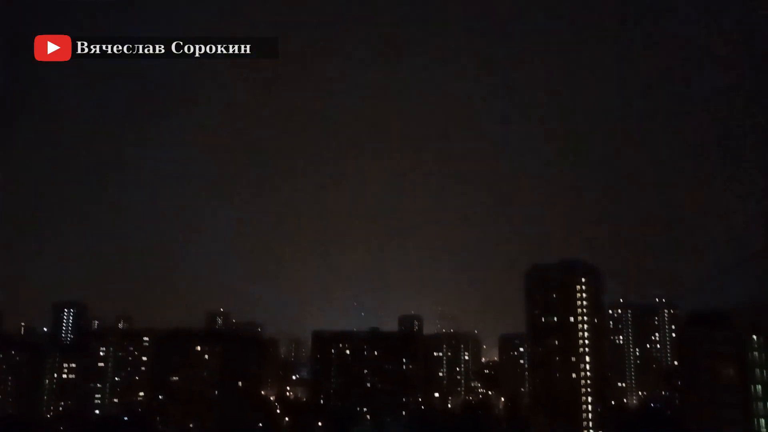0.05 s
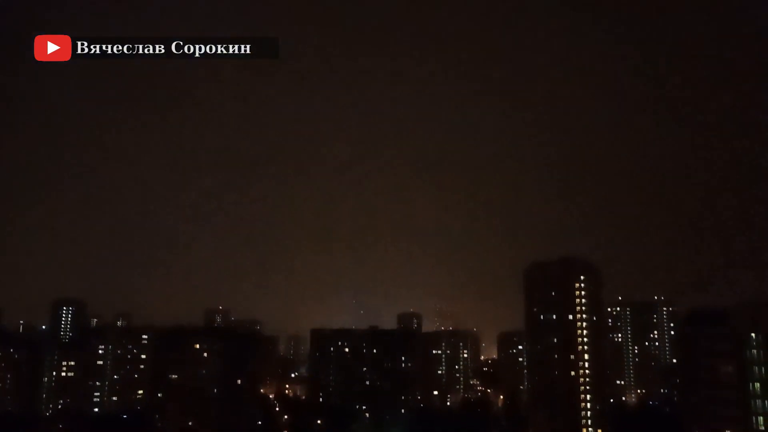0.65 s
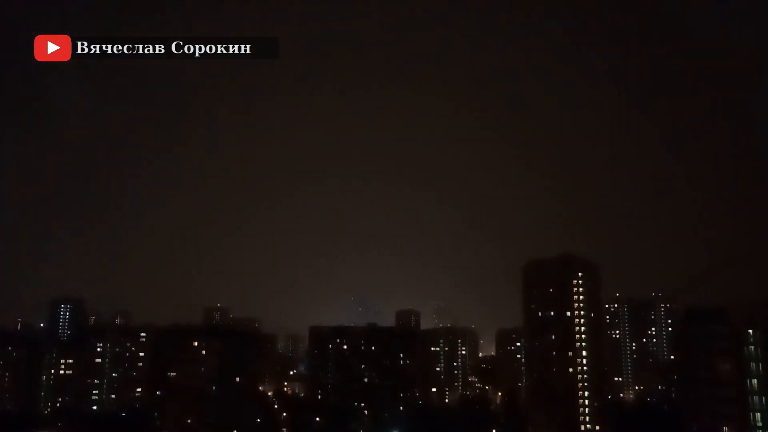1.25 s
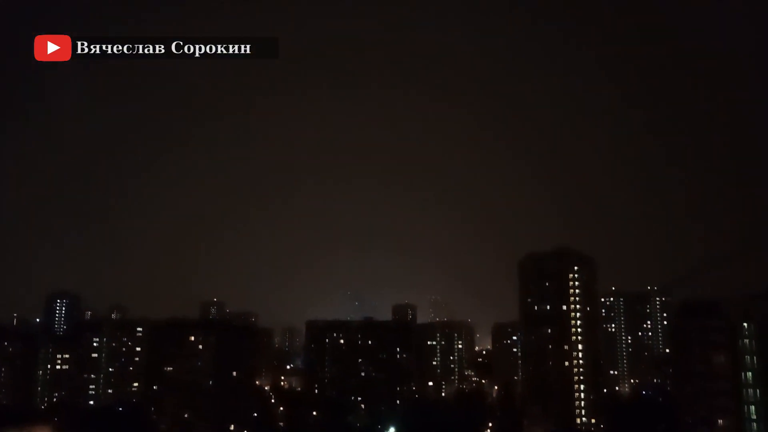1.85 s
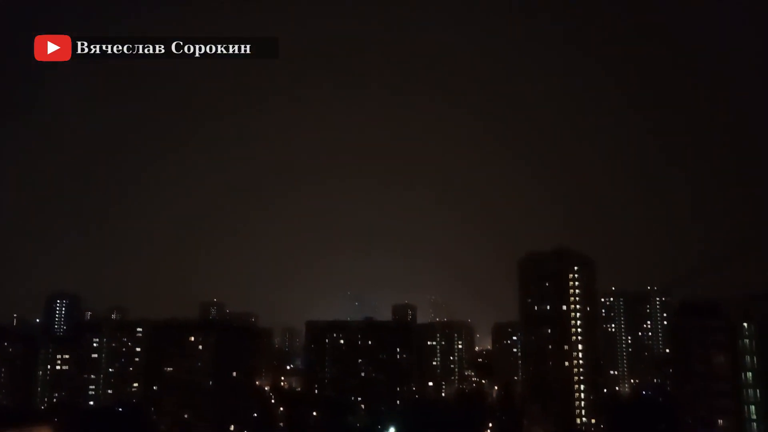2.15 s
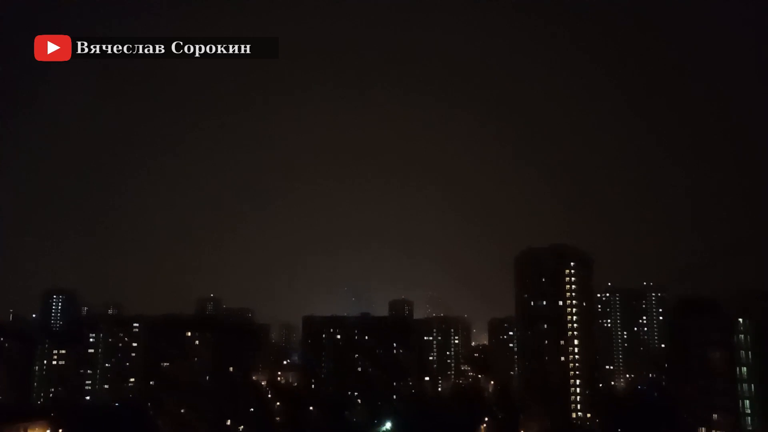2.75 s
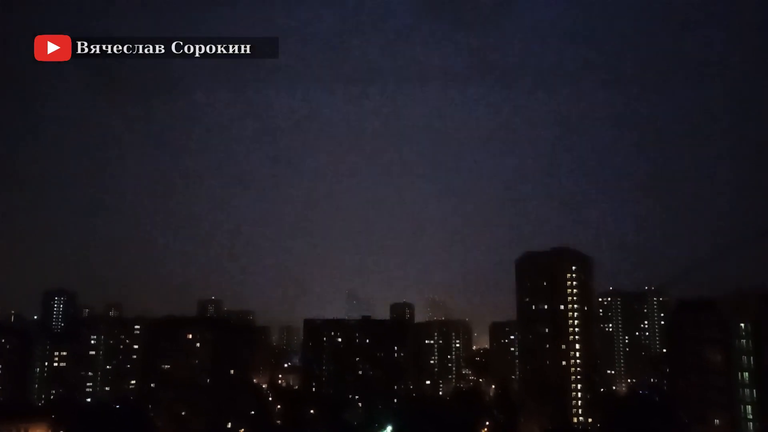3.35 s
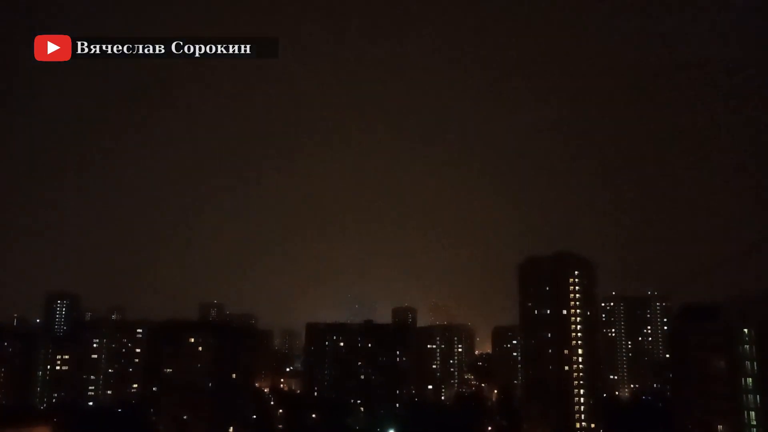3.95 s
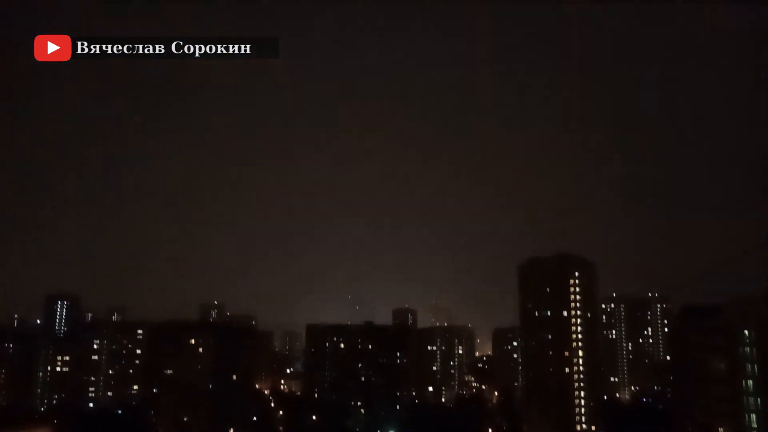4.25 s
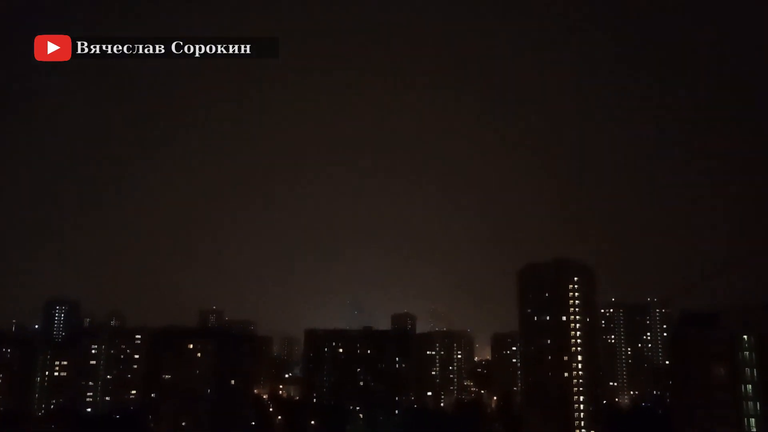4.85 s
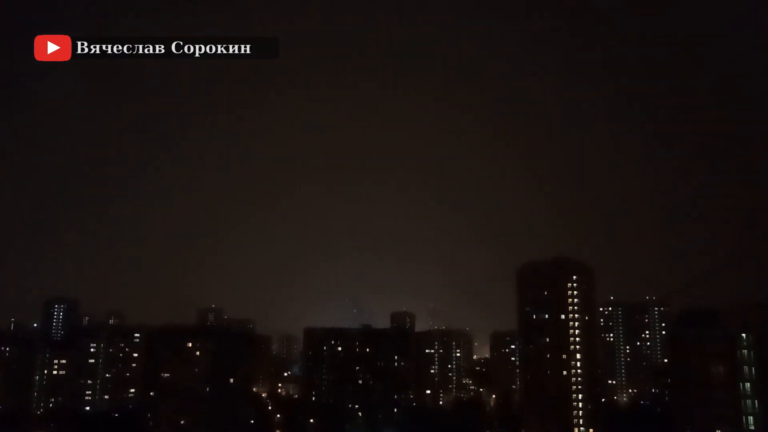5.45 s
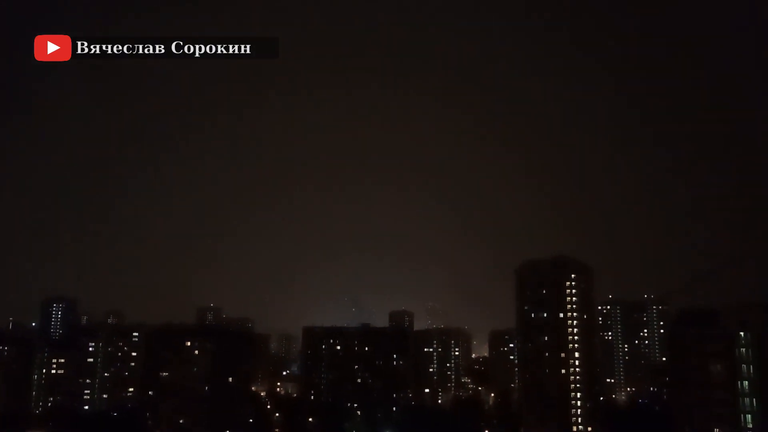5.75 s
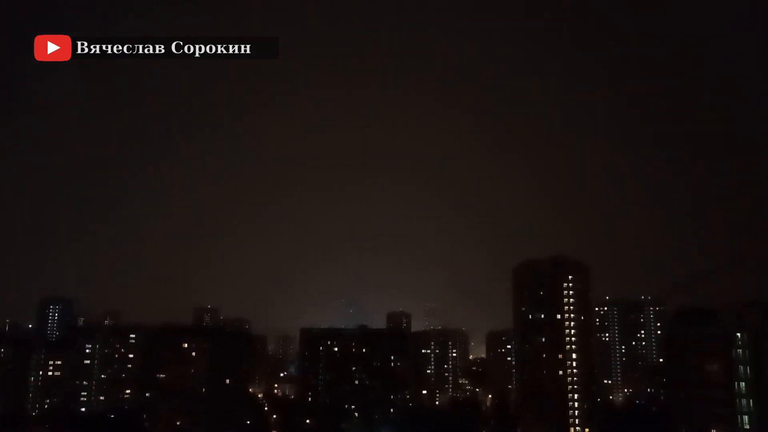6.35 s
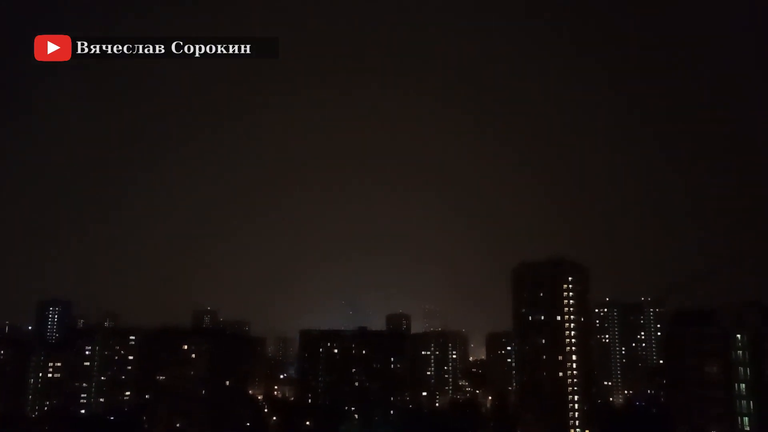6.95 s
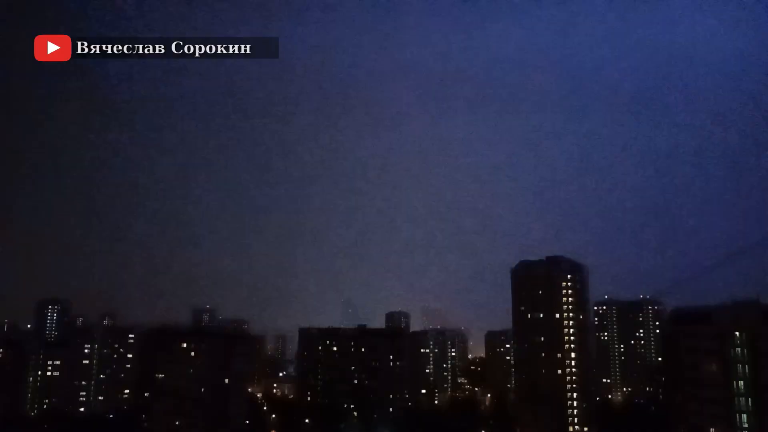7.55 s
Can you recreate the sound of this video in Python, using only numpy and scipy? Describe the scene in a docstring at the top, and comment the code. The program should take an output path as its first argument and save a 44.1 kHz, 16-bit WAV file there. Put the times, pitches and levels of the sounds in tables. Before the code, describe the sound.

Rain falls on a sheet-metal sill at a high city window, close and slightly to the left. Throughout, fat drops knock and splash irregularly, several a second, with short metallic rings and occasional dull thuds, over a fine patter and a very faint hiss of far rain. Distant, muffled thunder rumbles from the start and booms most strongly from about 0.5 to 1.7 seconds, then continues in smaller rolls. A faint high sizzle throbs quickly until about 2.3 seconds. Around 3 seconds the rain eases, and a faint thin whistle sounds briefly near 3.3 seconds. The drops return at once, with a sharp tick at 3.7 seconds, and from about 4 seconds the sill sounds hollower. The thunder sinks around 4.5 seconds and swells again from 5.5 to 6.7, while busier drops and a few wet ticks continue to the end, near 7.7 seconds.

```python
"""A high window over the city on a rainy night, with thunder rolling in the distance.
Fat drops knock and splash on a sheet-metal sill and make it ring, over a patter of small drops
and the faint hiss of far rain. The thunder, dulled by the air, booms in the window recess.
A fine sizzle throbs in the treble for the first two seconds; a thin whistle sounds in a lull."""
import sys
import numpy as np
from scipy import signal
from scipy.fft import rfft, irfft, next_fast_len
from scipy.io import wavfile
from scipy.ndimage import uniform_filter1d

SR = 44100
rng = np.random.default_rng(int(sys.argv[2]) if len(sys.argv) > 2 else 0)


def materialize(psi):
    """Save the field psi as 16-bit PCM at rate SR to the path in sys.argv[1].

    A 1-D psi becomes a single channel; in a 2-D psi each row is a channel.
    """
    bounded = np.clip(np.atleast_2d(psi).T, -1, 1)
    quanta = np.round(bounded * 32767).astype(np.int16)
    wavfile.write(sys.argv[1], SR, quanta)


N = 339570
TIME = np.arange(N) / SR

# Levels in all tables are relative: each sound gets its overall loudness later.
# fat drops hitting the sill: t/s, splash level/dB, knock level/dB, fade time/factor
FAT_DROPS = [(0.014, -32.5, -39, 0.41), (0.147, -46, -49, 1), (0.234, -48, -51.5, 1),
             (0.279, -42.5, -51, 0.81), (0.437, -42, -40, 0.32), (0.476, -43.5, -45, 1),
             (0.552, -37, -39.5, 0.8), (0.596, -40.5, -45.5, 1), (0.686, -35.5, -43.5, 0.89),
             (0.738, -36.5, -40.5, 0.67), (0.79, -41.5, -46.5, 1), (0.867, -46.5, -63, 0.26),
             (0.936, -47, -39, 0.76), (0.967, -41.5, -53, 0.45), (1.122, -42.5, -51.5, 1),
             (1.153, -39, -42.5, 0.7), (1.205, -44, -57, 0.37), (1.307, -42, -47.5, .9),
             (1.367, -34.5, -42, 0.36), (1.416, -40, -39.5, 0.42), (1.55, -40, -42, 1),
             (1.61, -36, -47.5, 0.6), (1.669, -40.5, -39.5, 0.41), (1.733, -32.5, -40, 0.29),
             (1.836, -41, -39.5, 0.39), (1.957, -42.5, -44, 0.66), (2.033, -42.5, -42, 0.74),
             (2.143, -40.5, -48, .8), (2.197, -39.5, -48, 0.43), (2.271, -38, -49, 0.37),
             (2.306, -39, -47, 0.51), (2.418, -43.5, -52, 0.26), (2.527, -42.5, -52, 0.7),
             (2.571, -42.5, -40, 0.53), (2.631, -43, -48, 1), (2.663, -43.5, -44, 0.54),
             (2.835, -48, -53, 1), (2.901, -37.5, -42, 0.39), (2.95, -42.5, -42.5, 0.39),
             (2.999, -48, -48.5, 0.36), (3.157, -55, -75, 0.62), (3.271, -41.5, -55.5, 0.47),
             (3.367, -35, -38, 0.53), (3.437, -34, -41.5, 0.53), (3.487, -42.5, -45.5, 0.36),
             (3.536, -35, -42, 0.75), (3.607, -30, -37, 0.83), (3.77, -29.5, -35, 0.32),
             (3.84, -43, -44.5, 0.25), (4.003, -37, -45, 0.47), (4.085, -51, -40, 0.33),
             (4.162, -45.5, -45, 0.46), (4.258, -30.5, -37, 0.33), (4.368, -58, -68, 0.71),
             (4.464, -46, -46, .5), (4.536, -42.5, -42.5, 0.65), (4.586, -52, -47.5, 1),
             (4.854, -40.5, -41.5, 1), (4.894, -35, -38, 0.45), (5.031, -35.5, -38.5, 1),
             (5.099, -35, -41, 0.3), (5.129, -40.5, -43, 0.26), (5.278, -33, -40, 0.44),
             (5.325, -50, -50, 0.66), (5.4, -33, -41.5, 0.59), (5.506, -35, -42, 0.28),
             (5.57, -33.5, -40, 0.38), (5.623, -42.5, -42, 0.52), (5.658, -41, -44, 0.54),
             (5.71, -33, -37.5, 0.43), (5.828, -43, -39.5, 1), (5.886, -44, -54, 0.73),
             (5.979, -33.5, -53, 0.26), (6.041, -35, -48, 0.2), (6.101, -35.5, -40.5, 0.74),
             (6.173, -46.5, -66, 0.67), (6.307, -29, -35.5, 0.36), (6.422, -42, -46, 0.64),
             (6.492, -34, -37.5, 0.79), (6.515, -30, -48, 0.56), (6.606, -39.5, -45, 0.15),
             (6.672, -39.5, -45, 1), (6.7, -33, -40, 0.16), (6.774, -32, -43.5, 0.68),
             (6.806, -27, -41, 0.12), (6.847, -43, -57, 0.51), (6.896, -42, -46, 0.23),
             (6.93, -41.5, -56, 0.42), (6.978, -44, -48, 1), (7.052, -34.5, -38.5, 0.35),
             (7.251, -37.5, -38.5, 0.66), (7.322, -33.5, -41, 0.3), (7.447, -49.5, -47, 1),
             (7.609, -42, -41, 0.8), (7.668, -38.5, -61, 0.27)]
# notes at which the metal sill rings: f/Hz, width/Hz, level/dB against the direct sound
SILL_MODES = [(519, 8, -8), (665, 12, 0), (910, 9, 2.5), (1064, 30, -1.5), (1233, 13, -5), (1433, 22, -8),
              (3594, 80, -4), (5565, 62, -6)]
# notes at which the window recess booms: f/Hz, width/Hz, level/dB against the direct sound
RECESS_MODES = [(145, 12.8, 3), (191, 11.3, 7), (368.7, 3.4, -2.5)]


def amp(db):
    """Turns decibels into a factor to multiply by."""
    return 10 ** (np.asarray(db) / 20)


def unit(x):
    """Scales a signal to an average strength (rms) of 1."""
    return x / np.sqrt(np.mean(x ** 2) + 1e-20)


def even(x, size=520):
    """Evens out chance swells over `size` samples, keeping the fine grain."""
    power = abs(uniform_filter1d(x ** 2, size=size))
    return unit(x / np.sqrt(power + .05))


def add(mix, start_s, sound):
    """Mixes a sound in at the given time."""
    part = mix[max(round(start_s * SR), 0):][:len(sound)]
    part += sound[:len(part)]


def curve(points):
    """Joins (time, value) points with straight lines, giving a value for every sample."""
    return np.interp(TIME, *np.transpose(points))


def value_at(points, hz):
    """Looks up (frequency, value) points along a pitch-like (logarithmic) axis."""
    f, value = np.transpose(points)
    return np.interp(np.log(hz + 1), np.log(f + 1), value)


def filtered(x, response):
    """Turns each frequency up or down by the factor response(hz)."""
    size = next_fast_len(len(x) + 4096)
    hz = np.fft.rfftfreq(size, 1 / SR)
    return irfft(rfft(x, size) * response(hz), size)[:len(x)]


def colour(x, tone):
    """Shapes the lows and highs of a sound by a (frequency, dB) table; strength 1."""
    return unit(filtered(x, lambda hz: amp(value_at(tone, hz))))


def clicks(per_s, spread_db):
    """A shower of random clicks of unequal size."""
    happens = rng.random(N) < per_s / SR
    size = np.minimum(rng.exponential(1, N), 4)
    sign = rng.choice([-1., 1.], N)
    return unit(happens * sign * amp(spread_db * size))


def patchy(x, depth_db, width_bins, frames=9):
    """Makes random pitches come and go, as when each spot of metal favours its own."""
    spectra = signal.stft(x, nperseg=512, noverlap=384)[2]  # bins 86 Hz apart, frames 3 ms apart
    peaks = uniform_filter1d(rng.standard_normal(spectra.shape), frames, axis=1)
    bell = np.exp(-(np.arange(-8, 9) / width_bins) ** 2)
    peaks = unit(signal.fftconvolve(peaks, bell[:, None], "same"))
    gain = amp(depth_db * np.clip(peaks, -2, 2))
    return signal.istft(spectra * gain, nperseg=512, noverlap=384)[1][:N]


def ring(x, modes):
    """Adds the fading notes (modes) that a sound sets ringing in an object."""
    out = x.copy()
    for hz, width_hz, db in modes:
        decay = np.exp(-np.pi * width_hz / SR)
        pole = decay * np.exp(2j * np.pi * hz / SR)
        out += 2 * amp(db) * signal.lfilter([1 - decay], [1, -pole], x).real
    return out


def strikes(times, levels_db, lengths, rise_s, t60, tail_db=-20, tail_t60=.25, hold_s=0):
    """Loudness of blows that swell, hold and die to a weak tail; t60 is seconds to fade by 60 dB."""
    lead_s = .008  # the swell starts just before the blow
    t, power = np.arange(SR // 3) / SR - lead_s, np.zeros(N)
    for start, db, stretch in zip(times, levels_db, np.maximum(lengths, .1)):
        swell = .5 + .5 * np.tanh(t / (rise_s * stretch) - .5)
        decay = amp(-60 * np.maximum(t - hold_s, 0) / (t60 * stretch))
        tail = amp(tail_db - 60 * t / tail_t60)
        add(power, start - lead_s, (amp(db) * swell * (decay + tail)) ** 2)
    return np.sqrt(power)


def swells(rows, attack_s, t60):
    """Loudness of sounds given as (t/s, level/dB, length/s): each swells, holds and dies away."""
    t, power = np.arange(SR) / SR, np.zeros(N)
    for start, db, length in rows:
        rise = 1 - np.exp(-t / attack_s)
        fall = amp(db - 60 * np.maximum(t - length, 0) / t60)
        add(power, start, (rise * fall) ** 2)
    return np.sqrt(power)


def by_place(edge, middle):
    """Blends two values as the water moves from the sill's stiff edge towards its hollow middle."""
    # where the water lands: t/s, place (0 = edge, 1 = middle)
    landing_place = [(0, 0), (3.3, 0.0069), (3.8, 0.47), (4.25, 0.898), (7.7, 0.91)]
    return edge + (middle - edge) * curve(landing_place)


def on_sill(x, low_hz, high_hz):
    """One band of the sill's sound, its tone set by where the water lands; strength 1."""
    # tone of the stiff edge: f/Hz, level/dB
    edge_tone = [(400, -19), (720, -7), (900, 0.5), (1100, 0), (1500, -1.5), (2100, -6.5), (2700, 0.5),
                 (3500, -2), (4500, -3.5), (7300, -4.5), (8600, -20), (11000, -31.5), (15000, -60)]
    # tone of the hollow middle: f/Hz, level/dB
    middle_tone = [(400, -29), (700, -7), (880, -2.5), (1400, 3.5), (1750, -6.5), (2050, -42),
                   (2700, -15.5), (3650, -10.5), (4700, -19), (5500, -17.5), (7300, -24.5), (8800, -46),
                   (15000, -55)]
    band = filtered(x, lambda hz: ((1 + (low_hz / (hz + 1)) ** 14) * (1 + (hz / high_hz) ** 14)) ** -.5)
    return unit(by_place(colour(band, edge_tone), colour(band, middle_tone)))


def patter(split_hz=1900, fallback_delay_s=.0048):
    """Small drops drum and splash on the sill, joined by droplets falling back from the fat drops."""
    # the rain gusting and easing: t/s, level/dB
    gusts = [(0, -50.5), (.35, -55), (.77, -48), (1.08, -57.5), (1.5, -50.5), (1.9, -54), (2.2, -46.5),
             (2.45, -57), (2.7, -56.5), (3.2, -57), (3.58, -53.5), (3.9, -46), (4.4, -50), (4.8, -51),
             (5.05, -41.5), (5.25, -47), (6.8, -45.5), (7.7, -47)]
    shower = amp(curve(gusts))
    falls = [(start + fallback_delay_s, db, 0) for start, db, _, _ in FAT_DROPS]
    droplets = swells(falls, attack_s=.012, t60=.21)
    drum_level = np.hypot(shower, amp(-7.5) * droplets)
    splash_level = np.hypot(shower * amp(by_place(edge=-10.5, middle=-17.5)), amp(-11.5) * droplets)
    t = np.arange(SR // 20) / SR
    breakup = rng.standard_normal(len(t)) * amp(-60 * t / .07)  # each small drop breaks into droplets
    drum = on_sill(patchy(clicks(1500, 1.34), 4.5, 1.0, frames=14), 797, split_hz)
    bursts = signal.oaconvolve(clicks(260, 1.0), breakup)[:N]
    splash = on_sill(patchy(bursts, 4.5, .73, frames=16), split_hz, 10400)
    return amp(-4) * (drum_level * drum + splash_level * splash)


def thunder():
    """Far shocks arrive scattered and dulled by the air, and boom in the recess; near ones are brighter."""
    # rolls of thunder: t/s, level/dB, length/s
    rolls = [(0.0, -49.5, .17), (0.29, -56, 0.31), (0.55, -40, .24), (0.84, -39.5, 0.1),
             (0.96, -49.5, 0.074), (1.26, -42, 0.088), (1.39, -42, 0.2), (1.58, -47, 0.27),
             (1.9, -45.5, 0.057), (2.14, -44, 0.038), (2.23, -48.5, 0.039), (2.35, -50, 0.044),
             (2.7, -42, 0.061), (2.97, -48, 0.052), (3.39, -47, 0.095), (3.52, -49, 0.067), (3.7, -49, .05),
             (3.82, -48, .06), (3.95, -52.5, 0.11), (4.08, -48.5, .15), (4.68, -55, 0.045),
             (4.97, -55, .06), (5.14, -49.5, .05), (5.33, -53.5, .2), (5.55, -45.5, 0.19), (5.76, -57, .06),
             (5.98, -50.5, 0.067), (6.1, -42, 0.052), (6.3, -52.5, 0.13), (6.48, -49, 0.12),
             (6.63, -45.5, 0.084), (6.73, -52.5, 0.094), (7.25, -50.5, 0.094), (7.52, -50, 0.1)]
    # the rumble between the rolls: t/s, level/dB
    rumble = [(0, -48), (1.15, -55), (2.1, -56.5), (2.7, -55.5), (3.15, -62), (3.7, -59), (4.35, -70),
              (4.85, -61), (5.9, -57.5), (7.0, -55.5), (7.45, -63.5), (7.7, -58)]
    # tone of the deep boom: f/Hz, level/dB
    boom_tone = [(25, -35), (45, -18.5), (70, -5.5), (115, 3.5), (150, 6), (210, -7), (260, -20.5),
                 (330, -27), (600, -65)]
    # tone of the growl above it: f/Hz, level/dB
    growl_tone = [(150, -30), (240, 2), (380, 6.5), (550, -1.5), (700, -9), (950, 8.5), (2000, -43)]
    # loudness of the nearest rolls: t/s, level/dB
    near_level = [(0, -70), (.28, -57), (.45, -45.5), (.6, -45.5), (.76, -69), (.94, -46.5), (1.15, -68),
                  (1.35, -56), (1.53, -39.5), (1.7, -80), (2.5, -61), (2.9, -64.5)]
    # tone of the nearest rolls: f/Hz, level/dB
    near_tone = [(50, -50), (120, -26.5), (185, 10.5), (220, -4), (270, -5.5), (320, -20), (450, -51)]
    level = np.hypot(swells(rolls, attack_s=.007, t60=.15), amp(curve(rumble)))
    boom = unit(ring(colour(clicks(500, 1.6), boom_tone), RECESS_MODES))
    boom /= (uniform_filter1d(boom ** 2, size=2600) + .012) ** .67  # the shocks merge into an even roll
    growl = colour(patchy(clicks(1800, 1.6), 6.3, .71), growl_tone)
    growl = unit(ring(growl, RECESS_MODES + SILL_MODES))
    growl_level = np.hypot(amp(-23.5) * level, amp(-69))  # follows the boom, over a steady floor
    near = even(colour(clicks(1200, .7), near_tone), size=2600)
    return boom * level + growl * growl_level + near * amp(curve(near_level) + 1.5)


def far_rain():
    """Rain all over the city blurs into a faint smooth hiss, different at each ear."""
    # tone of the hiss: f/Hz, level/dB
    hiss_tone = [(30, 14), (130, -1), (300, 5.5), (600, -37), (1100, 0), (2100, -39.5), (3600, -29),
                 (7000, -26), (8400, -11), (9000, -8), (15000, -13)]
    return amp(-78.5) * np.array([colour(rng.standard_normal(N), hiss_tone) for ear in range(2)])


def throb(lead_s=0, first_s=.055, period_s=.1405, slowing_s=.00074, width_s=.023):
    """The beat of the sizzle, about 0-1: a strong and a weak swish in turn, gradually slowing."""
    count = np.arange(17)
    strong = first_s + period_s * count + slowing_s * count ** 2 / 2 - lead_s
    weak = strong + .49 * period_s
    t = TIME[::64]
    swishes = lambda times: np.exp(-((t[:, None] - times) / width_s) ** 2).sum(1)
    return np.interp(TIME, t, swishes(strong) + .6 * swishes(weak))


def sizzle(fizz_end_s=2.28, fade_s=.025):
    """A fine treble sizzle that throbs at first, each throb sweeping up into a short fizz."""
    # loudness of the sizzle: t/s, level/dB
    sizzle_level = [(0, -68), (1.0, -65), (2.22, -62.5), (2.38, -94), (2.52, -82), (2.68, -67), (2.88, -64),
                    (3.05, -79), (3.9, -98), (3.97, -64), (4.15, -73), (4.25, -100)]
    # tone of the sizzle: f/Hz, level/dB
    sizzle_tone = [(3000, -45), (5200, -4.5), (6000, -2), (7400, 0), (8400, -18), (10000, -26)]
    # tone of the higher fizz: f/Hz, level/dB
    fizz_tone = [(6000, -13), (8000, 1.5), (9200, 11.5), (11000, -1), (13000, -1), (15000, 5)]
    low = colour(patchy(rng.standard_normal(N), 4.2, 15.0), sizzle_tone)
    low *= amp(curve(sizzle_level) + 1 + 6 * throb(lead_s=.004))  # peaks just before the fizz
    fizz = colour(patchy(rng.standard_normal(N), 4.2, 3.9), fizz_tone)
    fizz *= amp(-77 + 17 * throb())
    return low + fizz * np.clip((fizz_end_s - TIME) / fade_s + 1, 0, 1)


def fat_drops(rise_s=.0038, hold_s=.0093, typical_splash_db=-42.5):
    """Each drop flattens, stays spread and drains: a knock on the metal, a splash and a fine spray."""
    times, splash_db, knock_db, lengths = np.transpose(FAT_DROPS)
    spray_db = -50.5 + .7 * (splash_db - typical_splash_db)  # bigger splashes throw more spray
    knock = even(on_sill(patchy(clicks(6000, 2.0), 7, 1.0), 840, 2236))
    splash = even(on_sill(patchy(clicks(7000, 1.7), 7, .37), 1790, 4090))
    spray = even(on_sill(patchy(clicks(9000, .73), 7, 1.2), 4070, 17000))
    knock *= strikes(times, knock_db, lengths, 2.14 * rise_s, t60=.52, hold_s=hold_s)
    splash *= strikes(times, splash_db, lengths, rise_s, t60=.36, hold_s=hold_s)
    spray *= strikes(times, spray_db, lengths, .5 * rise_s, t60=.28,
                     tail_db=-32, tail_t60=.22, hold_s=hold_s)
    return amp(-2) * knock + amp(-8.5) * splash + amp(-4.5) * spray


def pings(t60=.064, contact_s=.0017, scatter=.252, count=3):
    """The spot a fat drop strikes rings with a few close notes, higher towards the sill's middle."""
    t, out = np.arange(SR // 8) / SR, np.zeros(N)
    spot_hz = by_place(edge=3100, middle=3579)
    for start, db, _, _ in FAT_DROPS:
        detune, phase = rng.random((2, count))
        offsets = scatter * (detune - .5) * np.arange(1, count + 1) / count
        notes_hz = spot_hz[round(start * SR)] * (1 + offsets)
        notes = np.sin(2 * np.pi * (notes_hz[:, None] * t + phase[:, None])).sum(0) / np.sqrt(count)
        level = amp(db - 9 - 60 * t / t60) * (1 - np.exp(-t / contact_s))
        add(out, start + .001022, level * notes)
    return out


def thuds(note_hz=660, width_hz=170):
    """The heaviest water bends the whole sheet: a dull note, and a groan that lasts while it pours."""
    # heavy hits: t/s, note level/dB, groan level/dB, groan length/s
    hits = [(0.02, -43, -64, 0.026), (0.47, -52, -59.5, 0.1), (0.58, -59, -48.5, 0.064),
            (0.77, -60, -60.5, 0.29), (1.16, -57, -55.5, 0.041), (1.36, -59, -51, 0.067),
            (1.5, -71, -63.5, 0.16), (2.055, -49, -56.5, 0.037), (2.304, -78, -53.5, 0.063),
            (2.58, -54.5, -58, 0.083), (2.912, -72, -61, 0.036), (3.39, -72, -55.5, 0.15),
            (3.5, -58, -60, 0.032), (3.78, -77, -66, 0.17), (4.93, -52.5, -53.5, 0.12),
            (5.078, -53, -49, 0.11), (5.31, -55, -62.5, 0.15), (5.6, -56.5, -73, .05),
            (5.81, -51, -65.5, 0.096), (6.53, -50, -71, .06), (6.72, -62, -56, 0.13),
            (7.06, -60, -60, 0.093), (7.319, -53.5, -49.5, 0.026)]
    # tone of the bending sheet: f/Hz, level/dB
    groan_tone = [(150, -37), (250, -0.5), (380, 10), (550, -2.5), (700, 1), (950, 10), (2000, -43.5)]
    times, note_db, groan_db, lengths = np.transpose(hits)
    note = filtered(clicks(3000, .78), lambda hz: 1 / (1 + ((hz - note_hz) / width_hz) ** 4))
    note = even(unit(note), size=1000)
    note *= strikes(times, note_db, np.ones(len(hits)), rise_s=.02, t60=.24, tail_db=-34, tail_t60=.17)
    groan = colour(patchy(clicks(1800, 2.1), 8.1, .67), groan_tone)
    groan = even(ring(groan, RECESS_MODES), size=1500)
    groan *= swells(zip(times, groan_db, lengths), attack_s=.016, t60=.17)
    return amp(3) * (note + groan)


def whistle(pitch_hz=4500, width_hz=45):
    """A thin, slightly rough high tone in the lull, made from a narrow band of noise."""
    level = [(3.12, -93), (3.185, -70), (3.29, -62), (3.35, -100)]  # t/s, level/dB
    tone = filtered(rng.standard_normal(N), lambda hz: 1 / (1 + ((hz - pitch_hz) / width_hz) ** 2))
    return even(unit(tone), size=1000) * amp(curve(level))


def ticks():
    """Drops burst close by, each with a bright tick or a brief wet spray."""
    # bursting drops: t/s, level/dB, spray length/factor
    bursts = [(3.7129, -34.5, 0.29), (3.734, -47, 1.0), (3.955, -46, 0.69), (5.033, -53, 1.7),
              (5.711, -49, 5.8), (6.514, -50, 6.9), (6.801, -42, 5.8), (7.051, -49, 3.6)]
    # tone of a burst: f/Hz, level/dB
    burst_tone = [(1500, -6), (4000, 6.5), (7000, 7.5), (9500, -7), (15000, -16)]
    times, levels_db, lengths = np.transpose(bursts)
    level = strikes(times, levels_db, lengths, rise_s=.0005, t60=.02, tail_t60=.2)
    return colour(rng.standard_normal(N), burst_tone) * level


def stereo(x, echo_t60=.12):
    """The left microphone faces the sill; wall echoes differ left and right, most in the treble."""
    # how much louder the left side is: f/Hz, level/dB
    balance = [(60, 0), (150, 2), (380, 3.3), (700, 5.7), (1290, 7), (2380, 4.3), (4400, 4.4), (7000, -1.5),
               (8300, -14), (9500, -22), (11500, -16), (14500, -4)]
    # how alike the two sides are: f/Hz, likeness (0-1)
    likeness = [(700, .997), (3100, .99), (5000, .92), (7000, .65), (15000, .5)]
    alike = lambda hz: value_at(likeness, hz)
    left_share = lambda hz: 1 / (1 + amp(-value_at(balance, hz)))
    t = np.arange(SR // 10) / SR
    walls = rng.standard_normal(len(t)) * amp(-60 * t / echo_t60)
    echoes = signal.oaconvolve(x, walls / np.linalg.norm(walls))[:N]
    side = filtered(echoes, lambda hz: np.sqrt((1 - alike(hz)) / (1 + alike(hz))))
    side = filtered(side, lambda hz: 4 * left_share(hz) * (1 - left_share(hz)))
    left = 2 * filtered(x, left_share) + side
    return np.array([left, 2 * x - left])


def scene():
    """Rain on the sill, thunder behind it and the hiss of far rain all round."""
    rain = amp(-3.5) * ring(fat_drops() + thuds() + patter(), SILL_MODES) + pings() + ticks()
    side_thunder = amp(-17) * thunder()  # thrown back by the buildings, it arrives from the sides
    at_window = stereo(rain + sizzle() + whistle() + thunder())
    return at_window + np.array([side_thunder, -side_thunder]) + far_rain()


def record(dry):
    """Cuts away the very highest treble."""
    cutoff_hz = 15620
    low_pass = signal.firwin(511, cutoff_hz, window=("kaiser", 9), fs=SR)
    return signal.oaconvolve(dry, low_pass[None], "same")


dry = scene()
out = record(dry)
materialize(out)
```